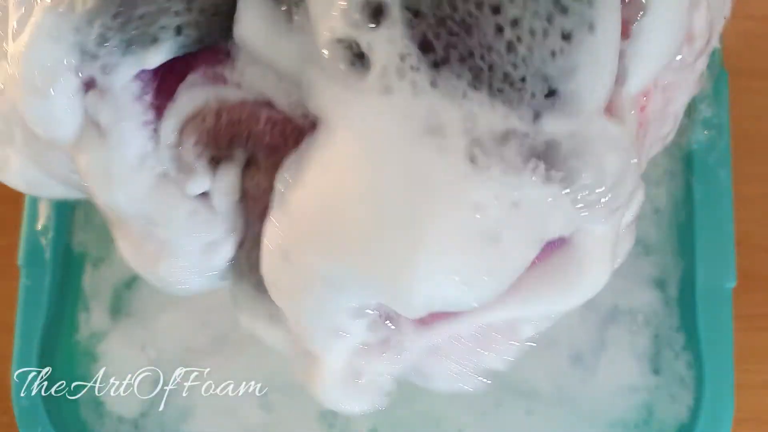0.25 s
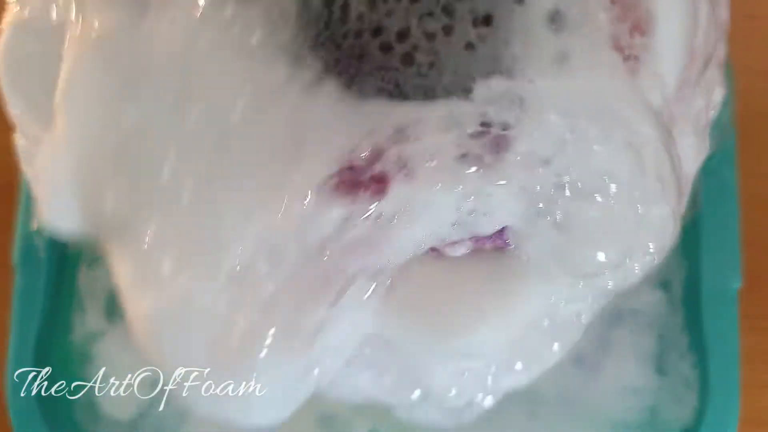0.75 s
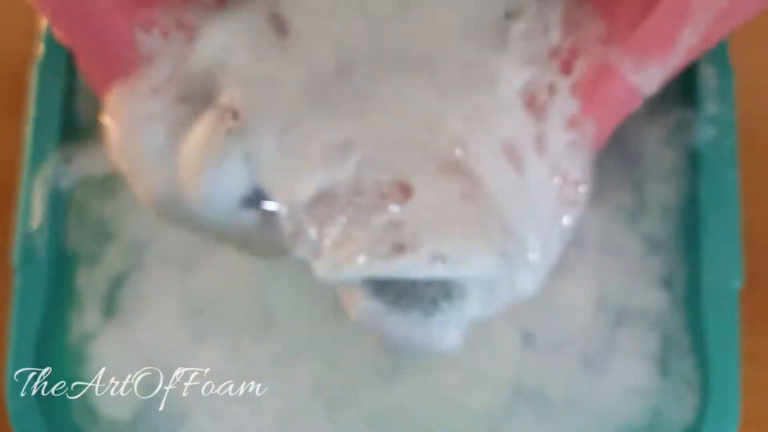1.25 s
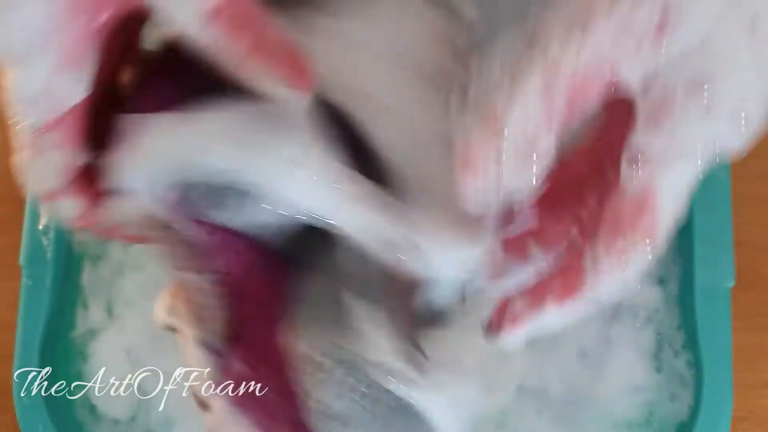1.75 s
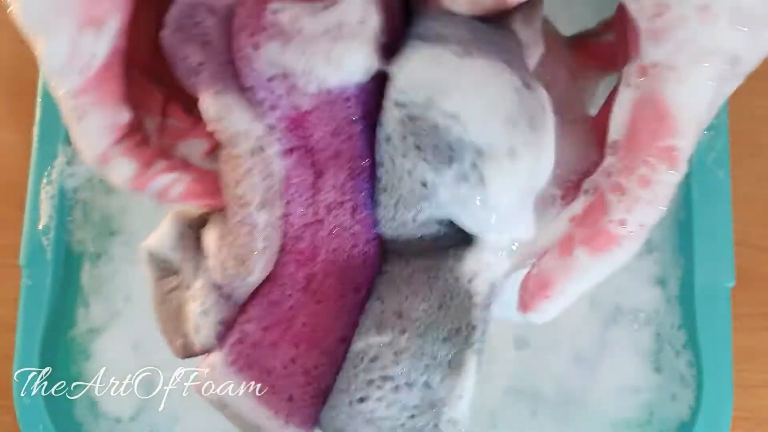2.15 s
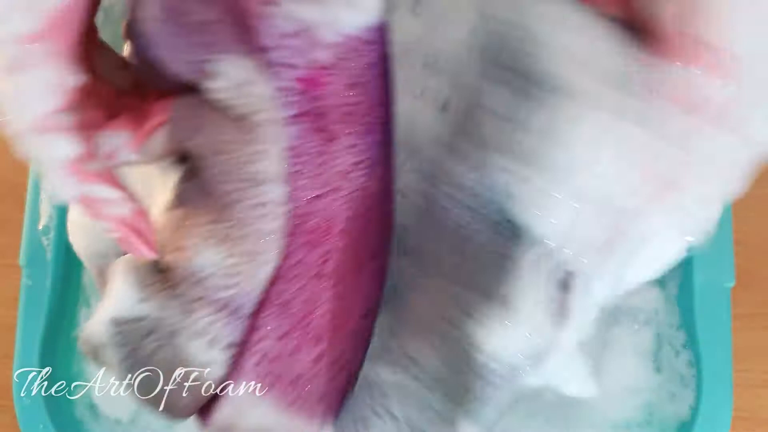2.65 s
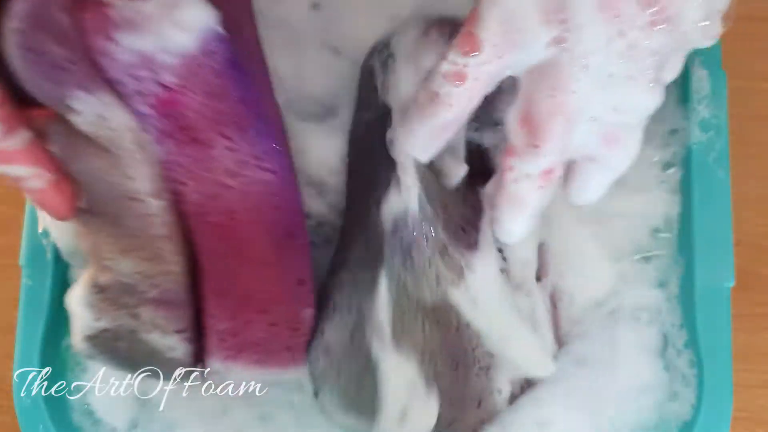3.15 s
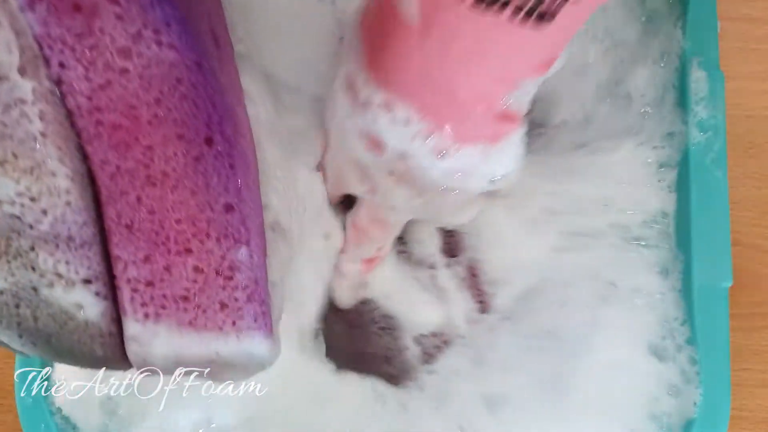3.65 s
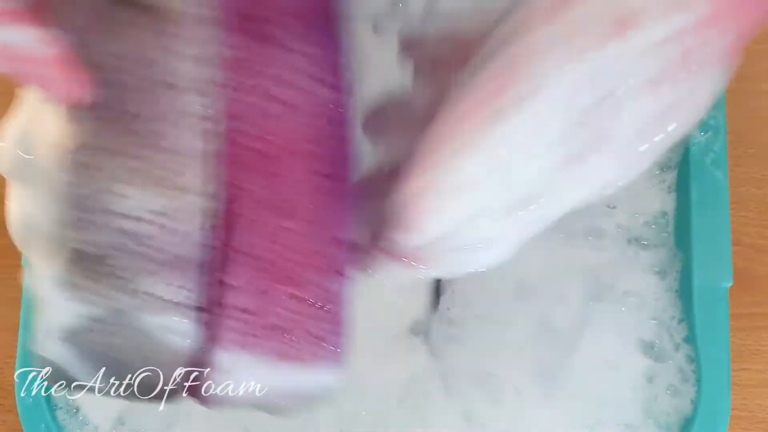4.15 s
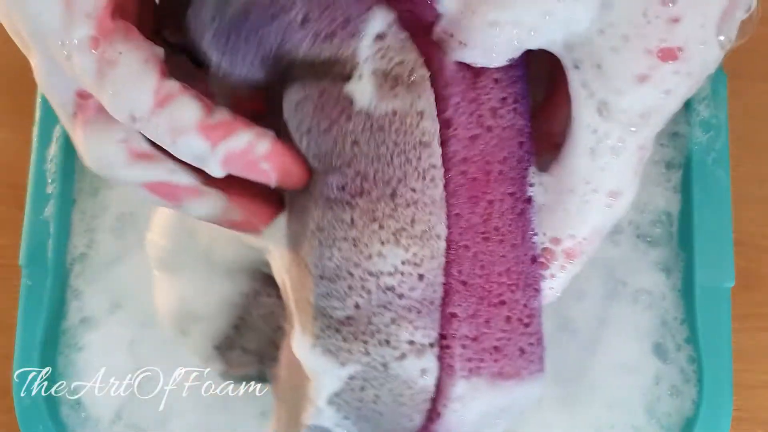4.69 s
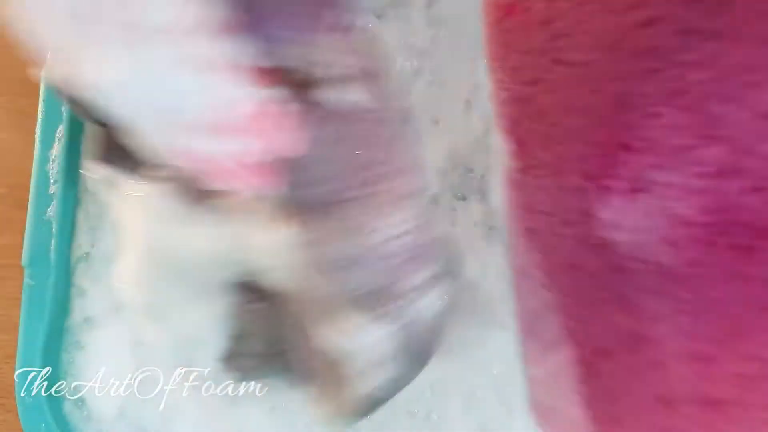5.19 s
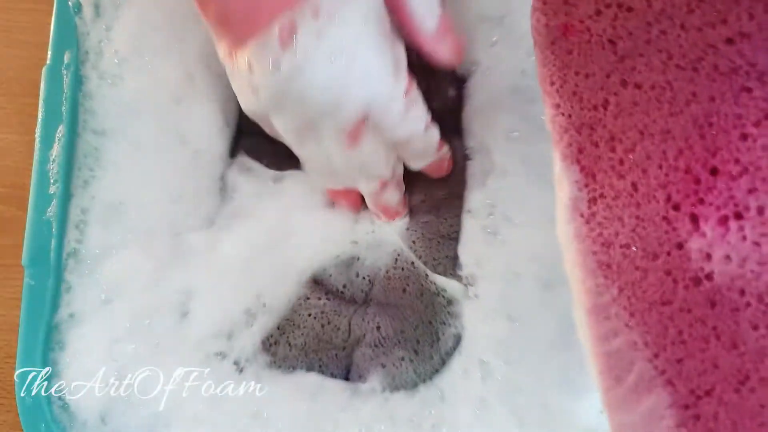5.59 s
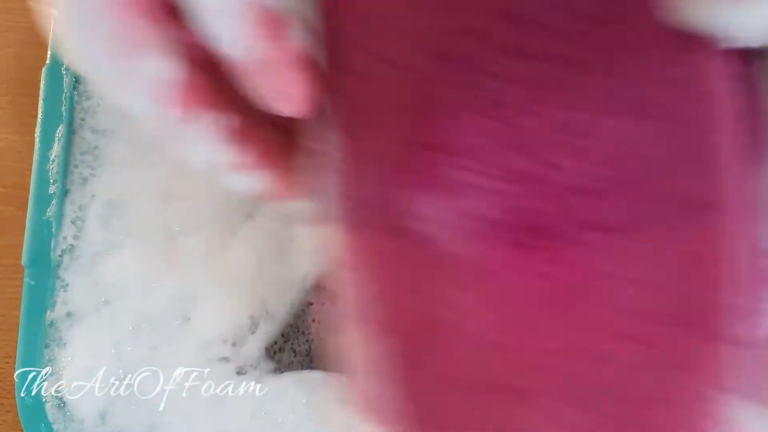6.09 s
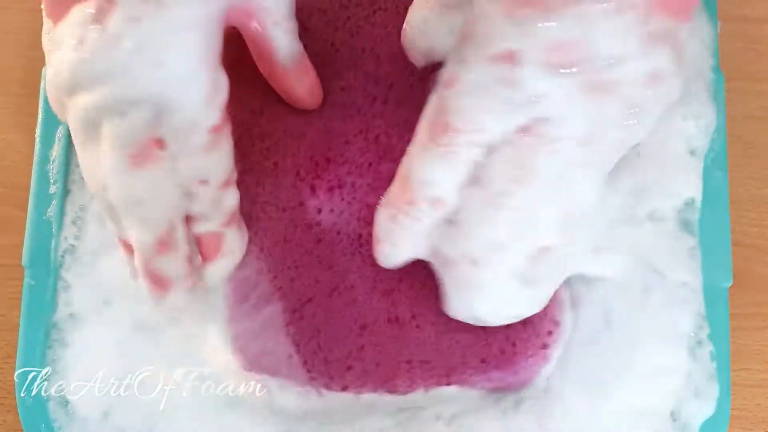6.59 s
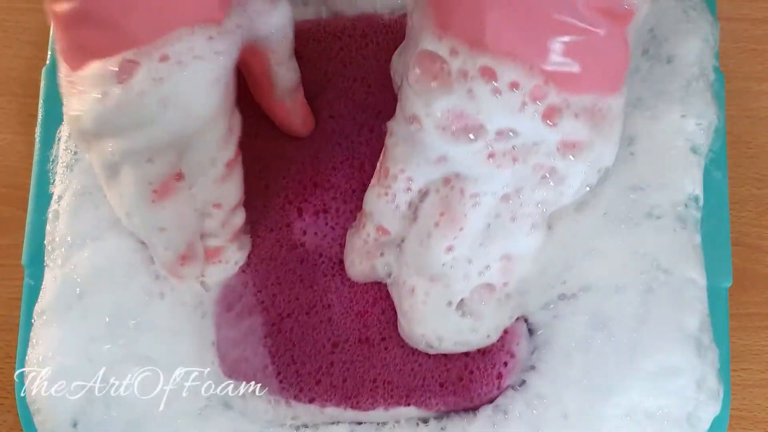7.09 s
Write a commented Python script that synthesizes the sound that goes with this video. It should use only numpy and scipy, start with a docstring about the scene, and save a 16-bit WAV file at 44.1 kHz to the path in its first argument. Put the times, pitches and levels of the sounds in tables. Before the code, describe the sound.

Gloved hands squeeze sudsy sponges over a basin, a dense run of wet pops easing into softer squishes and crackling foam.

```python
"""Kneading soapy sponges

Gloved hands knead sponges over a basin of suds, close to the microphone. Air pockets burst out of
the pores as short pops; suds gurgle and squish as swarms of ringing bubbles, foam fizzes and air
spurts through slits. Two motors and the mains hum in the room behind."""
import sys
import numpy as np
from scipy import signal
from scipy.fft import rfft, irfft, next_fast_len
from scipy.io import wavfile
from scipy.ndimage import uniform_filter1d

SR = 44100
rng = np.random.default_rng(int(sys.argv[2]) if len(sys.argv) > 2 else 0)


def wrap_up_sound(samples):
    """Save the sound to the file named by the first command line argument, as 16-bit audio."""
    columns = np.atleast_2d(samples).T
    # keep every value between -1 and 1, then stretch to whole-number steps
    tamed = np.clip(columns, -1, 1)
    steps = np.round(tamed * 32767).astype(np.int16)
    wavfile.write(sys.argv[1], SR, steps)


N = 323276


def pops():
    """Air pockets burst and swing briefly; the lip cracks at two higher pitches, the wet sponge thuds."""
    # bursting pockets: t/s, level/dB, f/Hz, lip crack/dB re level
    pockets = [(0.11, -15.5, 453, -9), (0.1423, -15, 875, -9), (0.1515, -18.5, 470, -9),
               (0.2249, -13, 860, -16), (0.2987, -14, 388, -2.5), (0.3189, -11.5, 860, -18.5),
               (.3435, -10.5, 660, -15), (.369, -8, 890, -15), (.387, -13.5, 910, 0),
               (0.4035, -8, 710, -13), (.444, -16, 900, -2), (0.4526, -7.5, 690, -17), (.459, -9, 890, -7),
               (0.4798, -5, 760, -11), (.496, -7, 710, -6), (0.5242, -9.5, 470, -10), (0.591, -8, 600, 2),
               (0.6129, 0.5, 830, -11.5), (.632, -16, 810, -9), (0.6507, -0.5, 708, -8),
               (0.6578, 1, 750, -15), (0.6618, 0, 655, -10), (0.6686, 0.5, 655, -3), (.6775, 2, 720, -2.5),
               (.6866, -2.5, 710, -4), (.696, 2, 700, -8), (.707, -4, 645, -15), (.715, -7, 900, -17),
               (0.7233, 5.5, 740, -3), (0.7314, -1, 915, -7), (0.7386, 0, 775, -11), (0.7455, 4, 760, -8),
               (0.7553, 5.5, 980, -14), (0.7647, 4.5, 755, -4.5), (0.779, -3, 775, -7.5),
               (0.8005, 2, 790, -8), (0.8188, 3, 860, -10), (.8341, 2.5, 860, -10), (0.8421, -5.5, 895, -8),
               (.85, -3.5, 870, -20), (.868, -12, 905, -16), (0.8772, -11, 810, -20),
               (0.891, -11, 950, -13), (0.9022, -8, 900, -6), (1.0048, -19, 624, -6),
               (1.038, -16, 840, -12), (1.092, -25, 2980, 5), (1.174, -22, 810, -12),
               (1.1852, -17, 1260, -23), (1.196, -23, 800, -21), (1.2075, -17, 796, -23),
               (1.212, -27, 320, -17), (1.2275, -16, 890, -18), (1.3357, -22, 403, 1),
               (1.352, -14, 2500, 0), (1.4142, -24, 815, -3.5), (1.4492, -17, 860, -17),
               (1.479, -17.5, 890, -13), (1.928, -18, 2620, -10.5), (1.9275, -20, 950, -15),
               (1.947, -12.5, 2450, -3), (1.948, -17.5, 745, -3), (1.97, -15.5, 810, -1),
               (1.9826, -15.5, 766, -3), (2.0201, -12, 2800, -12), (2.1778, -27, 700, -14),
               (2.1994, -18, 620, -12), (2.2108, -10.5, 616, -14), (2.2163, -12, 590, -16),
               (2.2281, -11, 634, -13), (2.2334, -10, 597, -17), (2.2396, -9.5, 600, -20),
               (2.2438, -14, 600, -20), (2.2483, -18, 560, -20), (2.2559, -9, 570, -19),
               (2.2607, -10, 636, -22), (2.2632, -14, 615, -20), (2.2651, -11, 605, -18),
               (2.3001, -16, 2920, -14), (2.3604, -14, 770, -12), (2.5602, -19.5, 820, -3),
               (2.5628, -24, 790, -9), (2.5831, -20.5, 2160, -13), (4.0652, -13.5, 2450, 7),
               (4.0847, -21, 2690, -10), (4.0908, -15, 3130, -11), (4.1096, -18, 2720, -11),
               (4.1343, -24.5, 1100, 9), (4.1397, -14.5, 1500, -11), (4.1431, -20, 1220, 2),
               (4.3546, -17.5, 410, 3), (4.367, -13, 724, -17), (4.3805, -27, 397, 3),
               (4.4279, -23, 1420, -8), (4.4406, -20, 620, -16), (4.4614, -14.5, 710, -5),
               (4.4865, -26, 415, -17), (4.499, -26, 890, -6), (4.5136, -15.5, 1050, -16),
               (4.5305, -17.5, 886, -6), (4.5686, -22, 740, 2), (4.5892, -14.5, 784, -6),
               (4.613, -13, 800, -10), (5.108, -26, 895, 6.5), (5.122, -33, 2250, -16),
               (5.1429, -19, 1850, -18), (5.2858, -26.5, 720, -14), (5.537, -29, 3800, -15),
               (5.983, -29.5, 1990, -10), (6.162, -27, 1680, -18), (6.3722, -16, 1930, -27),
               (6.4027, -19, 1840, -28), (6.4245, -25, 1920, -23), (6.468, -32, 2000, -20),
               (6.8533, -31, 820, -15), (6.885, -32, 900, -10), (6.904, -28, 1090, -3),
               (6.94, -30, 1200, -6), (7.0842, -22, 940, 3), (7.1124, -27, 1200, 2),
               (7.1758, -29, 3180, -20), (7.2213, -24.5, 1400, 3), (7.25, -27, 1510, 1),
               (7.272, -24, 2395, -21), (7.2872, -28, 1640, -10), (7.3155, -25, 2030, -16)]
    # ring time, short deep in wet foam: t/s, 60 dB decay/cycles
    ring_times = [(0.1, 5.5), (0.53, 2.5), (0.61, 8), (0.65, 5.2), (0.85, 6), (1.5, 8.5), (2.0, 4.5),
                  (2.18, 2), (2.27, 3), (2.6, 5), (4.1, 7), (4.5, 4), (4.62, 3), (5.1, 5), (6.4, 5),
                  (7.3, 5.5)]
    out = np.zeros(N)
    jitter = rng.uniform(-1, 1, (len(pockets), 3))
    for (s, level_db, hz, crack_db), (low_jitter, high_jitter, ring_jitter) in zip(pockets, jitter):
        cycles = np.interp(s, *np.transpose(ring_times)) + ring_jitter
        body = swing(hz, rise_cycles=0.28, fall_cycles=max(cycles, 2) / np.log(1000))
        low_crack = swing(hz * (2.96 + 0.2 * low_jitter), 0.36, 2.1)
        high_crack = swing(min(hz * (4.02 + 0.19 * high_jitter), 9000), 0.52, 1.3)
        thud = swing(min(hz / 3.06, 400), 0.24, 0.72)
        thud_db = -7.5 - 1.99 * cycles   # shorter ring, more thud
        add(out, s - .0003, -from_db(level_db) * body)
        add(out, s - .0002, from_db(level_db + crack_db - 6.0) * low_crack)
        add(out, s - .0002, from_db(level_db + crack_db - 10.5) * high_crack)
        add(out, s, from_db(level_db + thud_db) * thud)
    out += 0.0032 * (ring(out, 731, 31.0) + ring(out, 1020, 36.0))   # hollow between the hands
    return signal.sosfilt(signal.butter(2, 150, "high", fs=SR, output="sos"), out)


def kneading():
    """Squeezes build, hold and let go; powers add. Returns gurgle, squish, fizz/dB, gurgle centre/Hz."""
    # squeezes: t at full pressure/s, hold/s, gurgle/dB, squish/dB, fizz/dB, gurgle centre/Hz,
    # bubble change over hold/dB, fizz change over hold/dB
    squeezes = [(0.0, 0.29, -37, -35.5, -34.5, 520, 2, -4), (0.3, 0.24, -27, -33, -43, 603, 3, -6),
                (.57, 0.053, -32, -36.5, -46.5, 760, 2, 2), (0.64, 0.094, -24, -31, -43, 700, -1, 2),
                (.77, 0.095, -27.5, -36, -47.5, 844, -6, -7),
                (0.91, 0.062, -25.5, -31, -52.5, 770, -3, 2.5),
                (1.01, 0.098, -31.5, -35.5, -48, 603, -4.5, 6.5), (1.13, 0.056, -42.5, -48, -65, 600, 5, 0),
                (1.2, .12, -33, -48, -50, 520, 0.5, 10.5), (1.34, .11, -33, -35, -35.5, 450, 0, -6),
                (1.47, 0.15, -39.5, -32, -40.5, 880, -7, 1), (1.62, 0.17, -50, -55, -36, 620, -1, -8.5),
                (1.8, .12, -48, -50, -46, 520, 3, 1), (1.975, 0.08, -35, -34.5, -39, 800, 1, 8.5),
                (2.07, .11, -41.5, -45, -46, 520, -1.5, -3), (2.21, 0.068, -38, -42.5, -52.5, 576, 5, 3),
                (2.29, 0.033, -37, -42, -42, 500, -2, -1), (2.35, .11, -29.5, -34, -43, 656, -9, -2),
                (2.48, .13, -45.5, -45, -43.5, 680, -1, -6), (2.63, 0.076, -50.5, -53, -50.5, 600, 5, -3),
                (2.735, 0.13, -43, -45.5, -44, 620, -3, 2), (2.88, .258, -39.5, -43.5, -40, 500, -3, -3),
                (3.15, .12, -53, -59.5, -61, 340, 0.5, -2), (3.88, 0.1, -52.5, -56, -60, 400, 3, 7.5),
                (4.02, 0.081, -44, -48, -47.5, 700, 3, 8), (4.17, 0.041, -38, -38, -50, 610, 2.5, 2),
                (4.24, .015, -48, -43.5, -42, 850, 1, -2),
                (4.322, .065, -31.5, -33.5, -36.5, 550, -1.5, -6), (4.41, .02, -42, -43, -48, 640, -3, -8),
                (4.462, .08, -30, -37.5, -36.5, 596, -5, -8), (4.58, .07, -39.5, -41.5, -48, 650, 2, 1),
                (4.681, 0.14, -34, -36, -39, 610, -10, -4.5), (4.83, 0.12, -43.5, -43.5, -45, 650, -6, 3),
                (5.13, 0.16, -49.5, -47.5, -51.5, 520, -4, 10), (5.45, .12, -59, -58, -53.5, 500, 2, 6),
                (5.58, .11, -56, -49.5, -46, 700, 0.5, -1.5), (5.71, .07, -55, -52, -55.5, 540, -5, -5),
                (5.81, 0.059, -56, -48, -48, 500, 0, -6), (5.9, .18, -51, -53, -61, 520, 1, 0),
                (6.12, 0.063, -49.5, -45.5, -57, 680, 0, 0), (6.23, 0.047, -45.5, -44.5, -46.5, 640, -2, 2),
                (6.38, 0.3, -50, -51.5, -65, 520, -1, 0), (6.87, 0.089, -51, -57, -76, 540, 5, 0),
                (7.035, 0.081, -48.5, -46, -45.5, 910, 3, -6), (7.19, 0.16, -52.5, -48.5, -61, 700, -2, 0)]
    # suds at rest: gurgle/dB, squish/dB, fizz/dB, gurgle centre/Hz
    at_rest = (-59, -62.5, -58.5, 380)
    press_db_per_s, release_db_per_s = 360, 518
    *rest_db, rest_hz = at_rest
    t = np.arange(0, N + 64, 64) / SR
    power = from_db(rest_db)[:, None] ** 2 * np.ones(len(t))
    weighted_hz = power[0] * rest_hz
    for s, hold_s, *levels_db, hz, bubbles_db, fizz_db in squeezes:
        press_db = -press_db_per_s * np.maximum(s - t, 0)
        release_db = -release_db_per_s * np.maximum(t - s - hold_s, 0)
        change_db = np.outer([bubbles_db, bubbles_db, fizz_db], np.clip((t - s) / hold_s, 0, 1))
        squeeze = from_db(np.add.outer(levels_db, press_db + release_db) + change_db) ** 2
        power += squeeze
        weighted_hz += squeeze[0] * hz
    curves = (*10 * np.log10(power), weighted_hz / power[0])
    return [np.interp(np.arange(N) / SR, t, curve) for curve in curves]


def gurgle(level_db, centre_hz):
    """Suds forced through big pores: short bubbles whose size follows the gap between the sponges."""
    kicks = clicks(per_s=1400, spread_db=2.9, clump_db=2.5)
    weight = around(centre_hz, octaves=1.33, floor=0.34)
    rings = bubbles(kicks, np.geomspace(190, 1600, 12), cycles=8.8, weight=weight)
    return from_db(level_db + 2.5) * levelled(muffled(rings, 2100))


def squish(level_db):
    """Smaller bubbles squeezed through the foam."""
    kicks = clicks(per_s=3000, spread_db=3.7, clump_db=3.0)
    weight = around(centre_hz=1870, octaves=1.0, floor=0.57)
    rings = bubbles(kicks, np.geomspace(1100, 5200, 12), cycles=7.2, weight=weight)
    return from_db(level_db + 1.5) * levelled(muffled(rings, 4140))


def fizz(level_db):
    """Foam walls snap by the thousand over escaping air; the finest spray comes and goes."""
    # fizz spectrum: f/Hz, density/dB
    spectrum = [(1500, -2.5), (3000, 0.5), (5000, -1.5), (8000, -5.5), (12000, -13), (15500, -18.5)]
    snaps = rms_one(clicks(per_s=7000, spread_db=5.8, clump_db=1.5))
    spray = coloured(snaps + 0.78 * rng.standard_normal(N), spectrum)
    coarse = muffled(spray, 9300)
    flicker_db = 1.53 * drift(20.5)
    fine = from_db(0.82 * drift(4.2)) * (spray - coarse)
    return from_db(level_db + 2.0 + flicker_db) * levelled(coarse + fine)


def crackle(level_db):
    """Small pockets burst at random, louder as the foam is pressed."""
    kicks = clicks(per_s=49, spread_db=2.4, clump_db=4.0)
    rings = bubbles(kicks, np.geomspace(700, 3500, 8), cycles=5.5, weight=lambda hz: 1)
    return from_db(level_db + 3) * rings


def spurts():
    """A rough air jet starts at once, rings in a slit in the foam and thins out."""
    # jets: t/s, length/s, level/dB, slit resonance/Hz, bandwidth/Hz
    slits = [(0.903, 0.03, -16, 1020, 493), (0.942, 0.035, -22, 805, 400), (1.189, 0.12, -25.5, 1290, 1200),
             (1.338, 0.035, -29.5, 2460, 2980), (1.486, 0.078, -26.5, 1200, 900),
             (1.564, 0.049, -24, 1100, 696), (1.97, 0.052, -28, 2820, 1500),
             (2.263, 0.012, -27.5, 1520, 1510), (4.062, 0.01, -20, 2930, 3530),
             (4.082, .012, -26.5, 2980, 4000), (4.225, 0.016, -36, 4500, 2500),
             (4.322, 0.049, -32, 1910, 500), (4.308, 0.057, -35.5, 4700, 1200),
             (4.453, 0.027, -27, 2950, 3480), (5.162, 0.017, -34.5, 2050, 2000),
             (6.11, 0.054, -45, 1300, 900), (6.225, 0.039, -40.5, 1580, 700),
             (0.512, 0.047, -32, 1790, 900), (.955, .012, -38.5, 4700, 500),
             (1.093, 0.028, -50, 8000, 6000), (1.22, 0.021, -44, 8900, 6000),
             (1.468, 0.04, -38, 9800, 5500), (1.715, 0.0048, -34, 6500, 3020),
             (2.471, 0.03, -41.5, 9000, 6000), (6.554, 0.15, -52.5, 2800, 700),
             (2.727, 0.082, -45, 2670, 600), (7.043, 0.069, -46, 2710, 900),
             (6.174, 0.011, -41.5, 6000, 4000), (6.25, 0.035, -42, 4400, 1200)]
    out = np.zeros(N)
    jet = rms_one(clicks(per_s=2400, spread_db=0.83, clump_db=2.5)) + 0.28 * rng.standard_normal(N)
    for s, length_s, level_db, hz, width_hz in slits:
        t = np.arange(round(length_s * SR)) / SR
        resonance = ring(jet[round(s * SR):][:len(t)], hz, cycles=2.8 * hz / width_hz)
        hiss = muffled(resonance, min(hz + width_hz, 16000))
        envelope = np.minimum(t / 0.0019, 1) * (1 - t / length_s) ** 0.19
        add(out, s, from_db(level_db) * rms_one(hiss) * envelope)
    return out


def glugs():
    """Larger bubbles sing with overtones: each swells, rises slightly in pitch and fades."""
    # large bubbles: t at crest/s, level/dB, f/Hz, half length/s
    large_bubbles = [(1.226, -23, 345, 0.032), (1.348, -22, 207, 0.018), (1.422, -21, 255, 0.012),
                     (2.015, -21, 800, 0.025), (4.186, -20.5, 642, 0.01), (4.461, -14.5, 661, 0.012)]
    out = np.zeros(N)
    for s, level_db, hz, half_s in large_bubbles:
        t = np.arange(-round(half_s * SR), round(half_s * SR)) / SR
        phase = 2 * np.pi * hz * t * (1 + 3.1 * t)
        tone = np.sin(phase) + .25 * np.sin(2 * phase) + 0.051 * np.sin(3 * phase)
        envelope = np.cos(np.pi * t / half_s / 2) ** 2
        add(out, s - half_s, from_db(level_db) * envelope * tone)
    return out


def slaps():
    """Sponges slap the suds: a dull push that dies within a few cycles."""
    # slaps: t/s, level/dB, f/Hz
    hits = [(1.06, -19.5, 70), (2.001, -20, 72), (4.07, -16.5, 81.5), (5.802, -23, 153), (6.372, -20.5, 75)]
    out = np.zeros(N)
    for s, level_db, hz in hits:
        cycles = np.arange(round(8 * SR / hz)) * hz / SR
        add(out, s, from_db(level_db) * np.exp(-cycles / 0.59) * np.sin(2 * np.pi * cycles))
    return out


def ticks():
    """Lone tiny bubbles burst in the suds resting in the basin."""
    kicks = from_db(-45) * clicks(per_s=45, spread_db=3.5, clump_db=3.0)
    return bubbles(kicks, np.geomspace(2500, 10000, 5), cycles=3.0, weight=lambda hz: (hz / 5000) ** .3)


def room():
    """Two motors and the mains hum over rumble and microphone hiss."""
    # hum lines, close pairs beat: f/Hz, level/dB, t at crest/s
    hum_lines = [(40.98, -52.5, .2), (48.055, -29.5, .343), (48.785, -39.5, .343), (97.69, -47, .494),
                 (100.02, -42.5, .494), (195.48, -50.5, .3), (244.0, -60, .3), (293.0, -60, .3)]
    # rumble and hiss: f/Hz, density/dB
    spectrum = [(25, -3), (45, -2), (56, -5), (67, 4), (85, -5), (170, -5), (280, -10.5), (450, -44),
                (700, -16.5), (1400, -30), (4000, -50), (9000, -37.5), (15800, -39)]
    t = np.arange(N) / SR
    hum = sum(from_db(db) * np.cos(2 * np.pi * hz * (t - s)) for hz, db, s in hum_lines)
    return hum + from_db(-42.5) * coloured(rng.standard_normal(N), spectrum)


def swing(hz, rise_cycles, fall_cycles):
    """Damped sine with soft onset and sinking pitch; envelope peak 1."""
    cycles = np.arange(round(9 * SR / hz)) * hz / SR
    envelope = (1 - np.exp(-cycles / rise_cycles)) ** 3 * np.exp(-cycles / fall_cycles)
    return envelope / envelope.max() * np.sin(2 * np.pi * cycles * (1.08 - 0.036 * cycles))


def clicks(per_s, spread_db, clump_db):
    """Random impulses of uneven size, in clumps."""
    sizes = from_db(spread_db * np.minimum(rng.exponential(1, N), 4)) * rng.choice([-1, 1], N)
    fires = rng.random(N) < per_s * from_db(clump_db * drift(25)) / SR
    return sizes * fires + 1e-18


def bubbles(kicks, pitches_hz, cycles, weight):
    """Each kick rings one bubble size at random, with gain weight(hz)."""
    size = rng.integers(0, len(pitches_hz), N)
    return sum(weight(hz) * ring(kicks * (size == k) + 1e-18, hz, cycles)
               for k, hz in enumerate(pitches_hz))


def around(centre_hz, octaves, floor):
    """Gain by bubble pitch: a bell curve over a floor."""
    return lambda hz: floor + np.exp(-(np.log2(hz / centre_hz) / octaves) ** 2)


def ring(x, hz, cycles):
    """Resonator that decays 60 dB in the given cycles."""
    radius, angle = from_db(-60 * hz / (cycles * SR)), 2 * np.pi * hz / SR
    return signal.lfilter([0, np.sin(angle)], [1, -2 * radius * np.cos(angle), radius ** 2], x)


def muffled(x, hz):
    """Foam absorbs the treble: low-pass."""
    return signal.sosfilt(signal.butter(2, hz, fs=SR, output="sos"), x)


def drift(corner_hz):
    """Slow random curve, rms 1: coarse noise through a double one-pole low-pass."""
    step = 40
    pole = np.exp(-2 * np.pi * corner_hz * step / SR)
    slow = signal.lfilter([1], [1, -2 * pole, pole ** 2], rng.standard_normal(N // step + 2002))[2000:]
    return np.interp(np.arange(N) / step, np.arange(len(slow)), rms_one(slow))


def coloured(x, spectrum):
    """Shapes a flat signal to (f/Hz, level/dB) points; rms 1."""
    size = next_fast_len(N)
    hz = np.arange(size // 2 + 1) * SR / size + 1
    points_hz, points_db = np.transpose(spectrum)
    gain = from_db(np.interp(np.log(hz), np.log(points_hz), points_db))
    return rms_one(irfft(rfft(x, size) * gain, size)[:N])


def levelled(x):
    """Evens the rms to 1 over 40 ms."""
    return x / np.sqrt(uniform_filter1d(x ** 2, size=SR // 25) + 1e-20)


def rms_one(x):
    return x / np.sqrt(np.mean(x ** 2) + 1e-20)


def from_db(db):
    return 10 ** (np.asarray(db) / 20)


def add(out, start_s, sound):
    at = int(round(start_s * SR))
    out[at:at + len(sound)] += sound[:N - at]


def scene():
    """Kneaded foam, single events and the room; mono."""
    gurgle_db, squish_db, fizz_db, gurgle_hz = kneading()
    foam = gurgle(gurgle_db, gurgle_hz) + squish(squish_db) + fizz(fizz_db) + crackle(squish_db)
    return (foam + ticks() + pops() + spurts() + glugs() + slaps() + room())[None]


def record(dry):
    """The microphone drops deep bass; gain control ducks after loud pops; soft clip; top cut."""
    threshold_db, decay_db_per_s, duck_db_per_db, cutoff_hz = -8.0, 9.5, 0.3, 15750
    heard = signal.sosfilt(signal.butter(4, 34, "high", fs=SR, output="sos"), dry)
    over_db = np.maximum(20 * np.log10(np.abs(heard[0]) + 1e-9) - threshold_db, 0)
    decay_db = decay_db_per_s * np.arange(N) / SR
    held_db = np.maximum.accumulate(over_db + decay_db) - decay_db   # decaying peak hold
    ducked = heard * from_db(-duck_db_per_db * uniform_filter1d(held_db, size=400))
    clipped = 1.33 * np.tanh(ducked / 1.257)
    return signal.sosfilt(signal.ellip(12, .5, 70, cutoff_hz, fs=SR, output="sos"), clipped)


dry = scene()
out = record(dry)
wrap_up_sound(out)
```